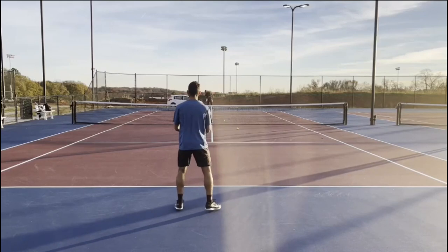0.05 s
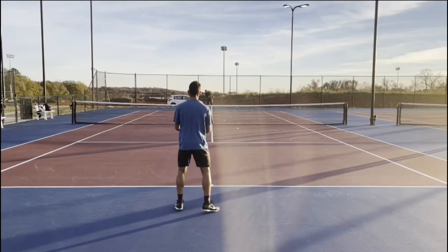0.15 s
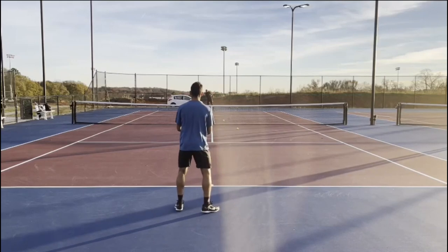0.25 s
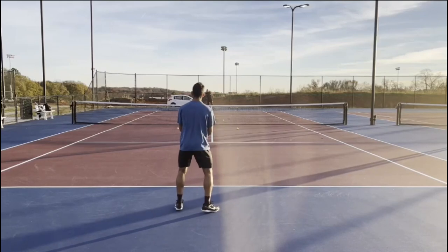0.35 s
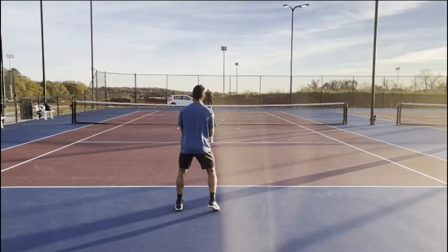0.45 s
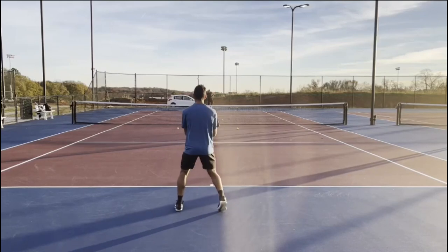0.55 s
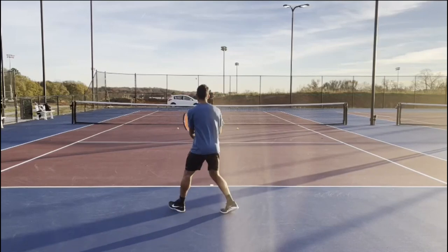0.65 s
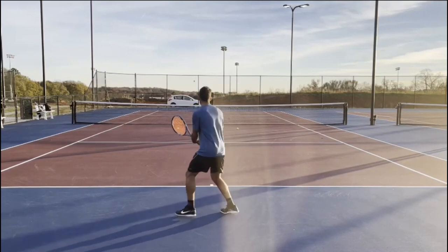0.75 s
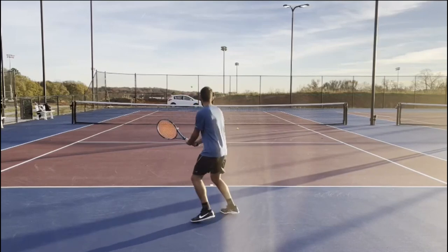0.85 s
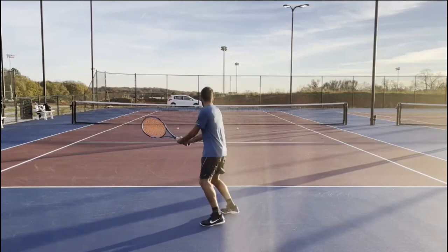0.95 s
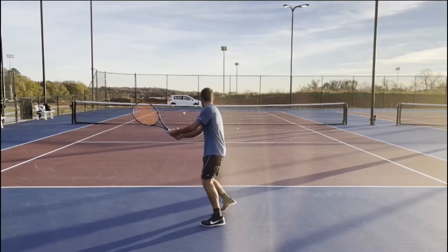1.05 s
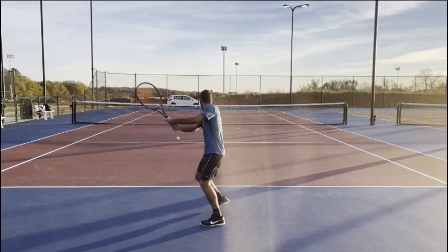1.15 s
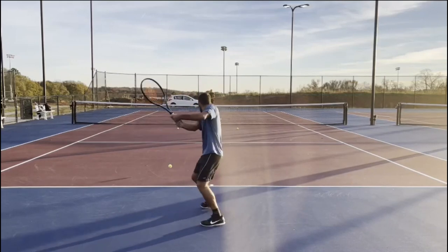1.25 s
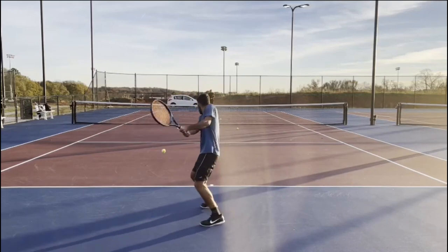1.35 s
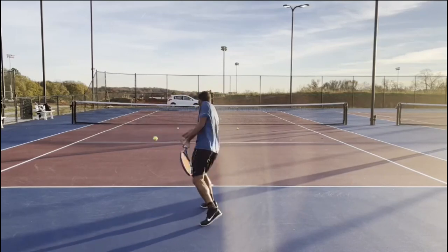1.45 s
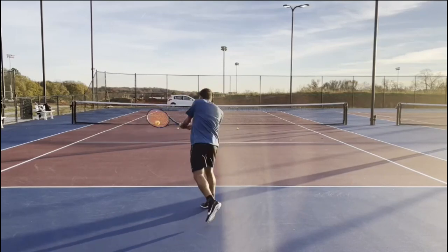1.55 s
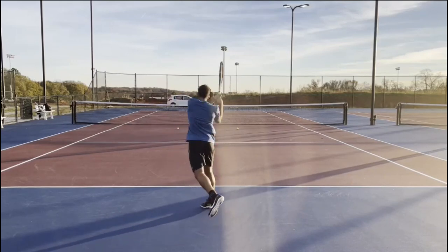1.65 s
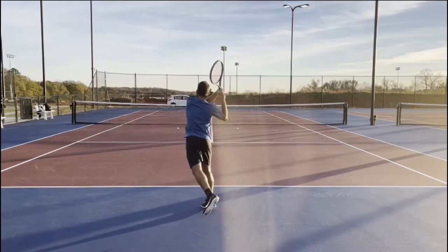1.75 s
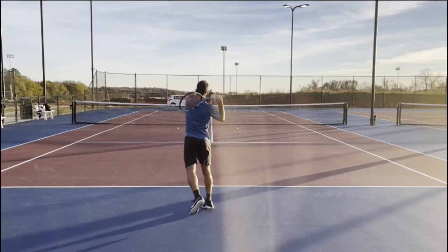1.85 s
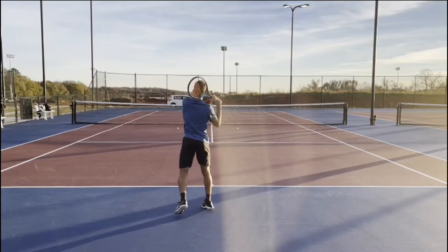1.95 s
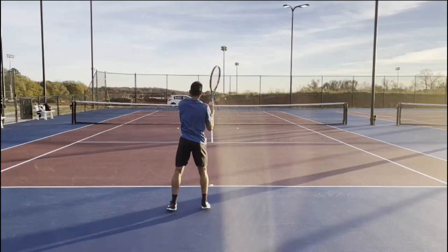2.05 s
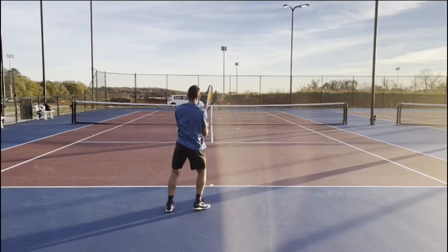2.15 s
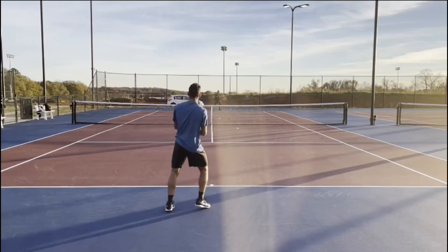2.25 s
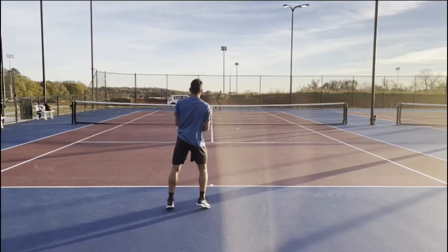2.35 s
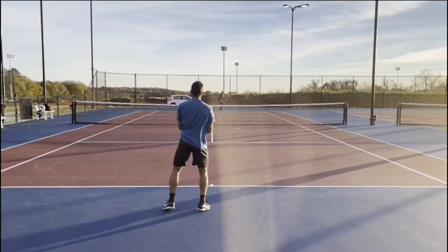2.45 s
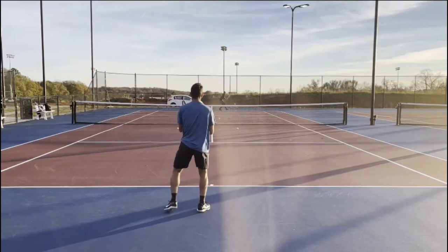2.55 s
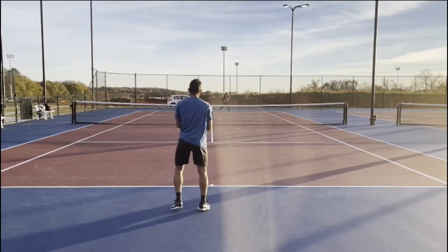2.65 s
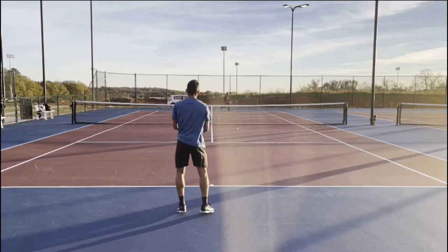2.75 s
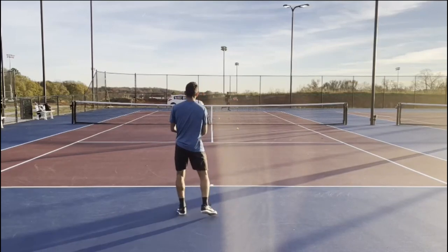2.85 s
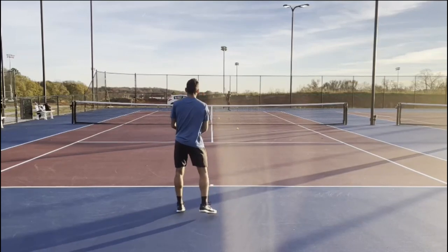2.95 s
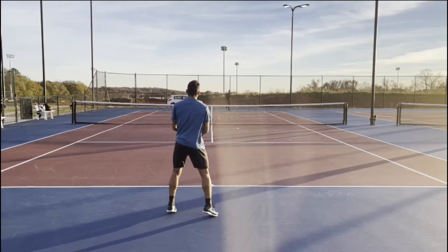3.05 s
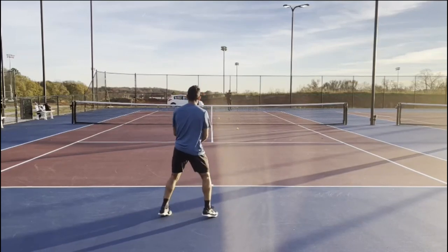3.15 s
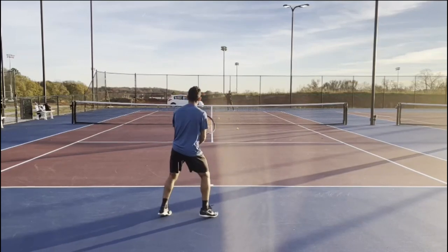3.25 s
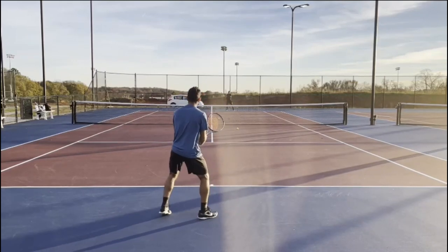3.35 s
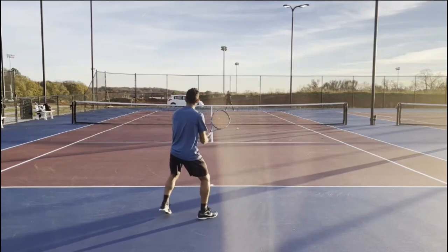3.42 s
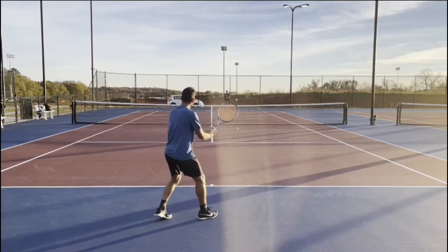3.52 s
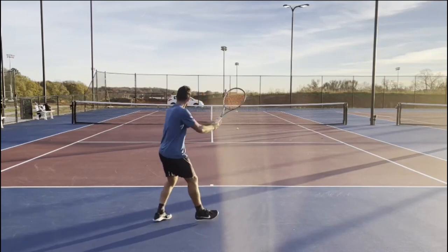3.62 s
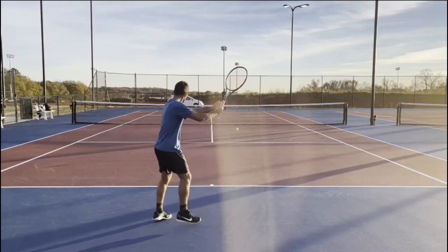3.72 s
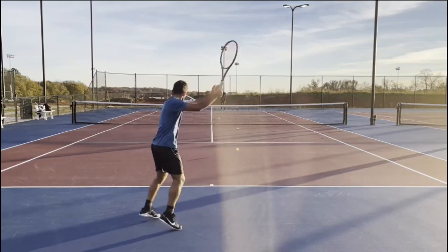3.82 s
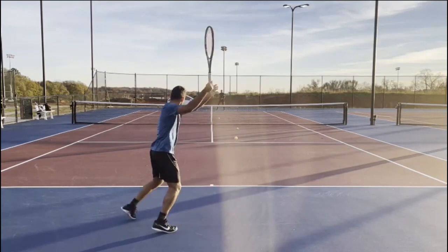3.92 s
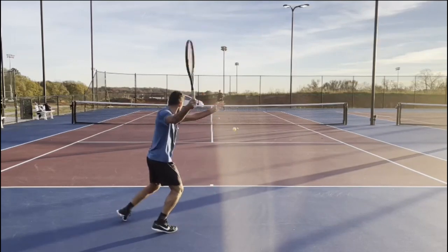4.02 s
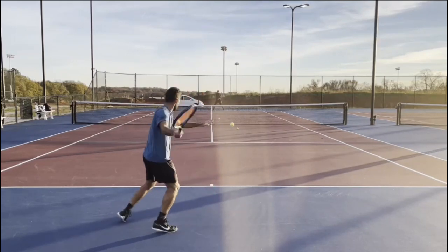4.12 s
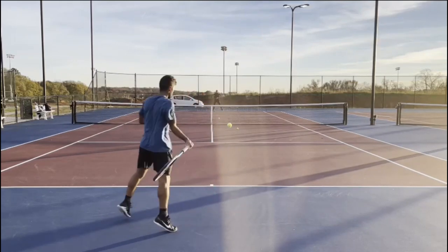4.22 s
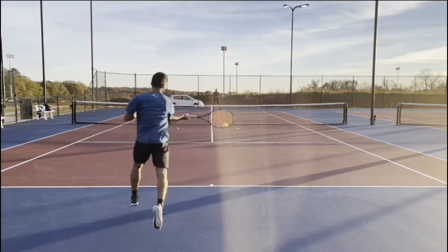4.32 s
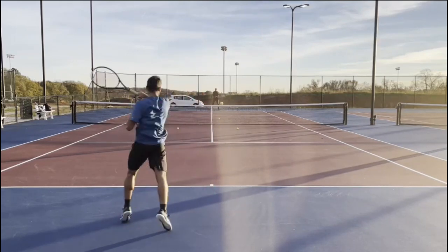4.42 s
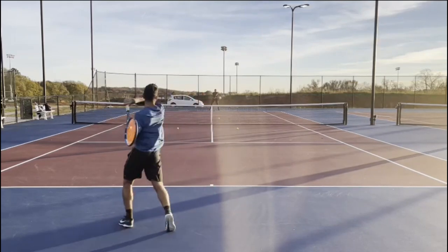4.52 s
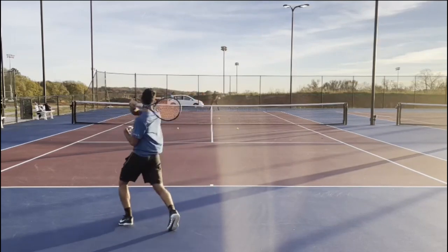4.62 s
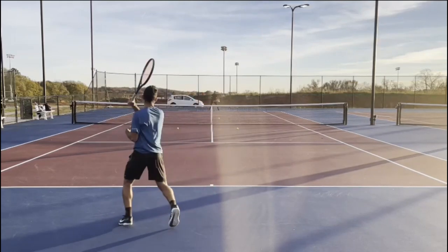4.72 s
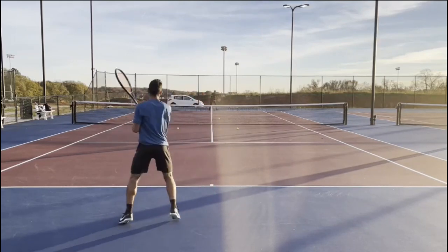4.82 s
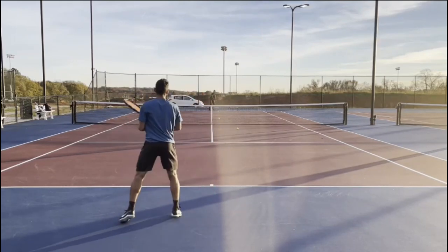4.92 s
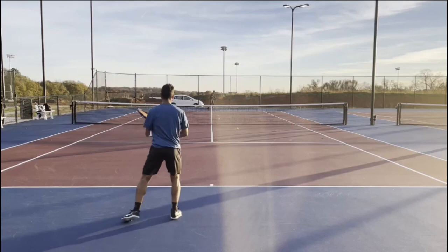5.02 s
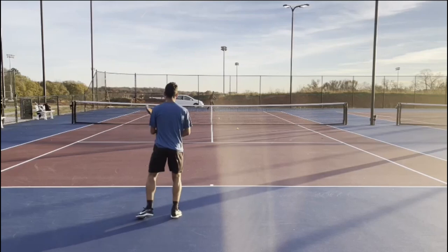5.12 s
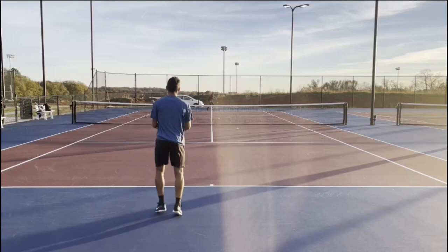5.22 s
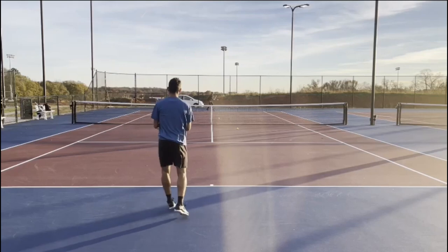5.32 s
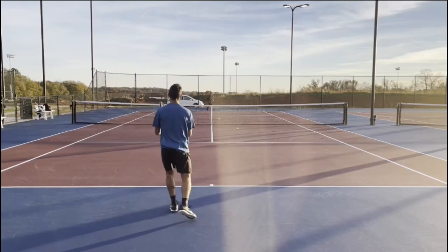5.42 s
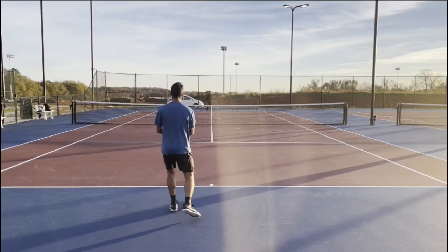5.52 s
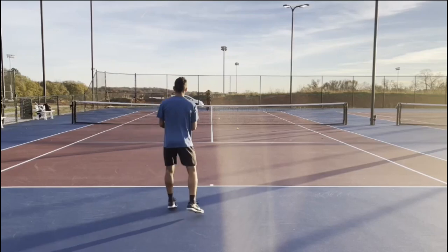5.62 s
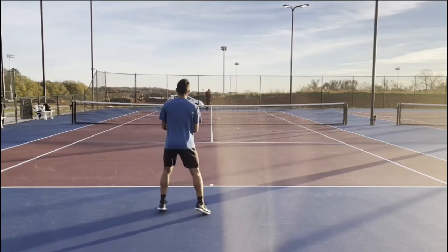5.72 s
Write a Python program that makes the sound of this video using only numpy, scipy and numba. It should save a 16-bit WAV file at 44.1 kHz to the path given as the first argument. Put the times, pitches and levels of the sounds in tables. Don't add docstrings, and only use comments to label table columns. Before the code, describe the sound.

Two players exchange tennis shots in open air. The nearer racket gives two hard, stringy pops, at about 1.6 and 4.4 seconds, each just after a hollow bounce; distant strokes sound duller and wetter. Between them, soles scrape, skid and squeal on gritty paint and heels tap. Far traffic rumbles and rises, with a faint motor hum and barely audible insect. Small stereo microphone behind the near player, dulled top treble.

```python
import sys
import numpy as np
from scipy import signal
from scipy.fft import rfft, irfft, next_fast_len
from scipy.io import wavfile
from scipy.ndimage import uniform_filter1d
from numba import njit

SR = 44100
rng = np.random.default_rng(int(sys.argv[2]) if len(sys.argv) > 2 else 0)


def to_wav(sig):
    pcm = np.clip(np.atleast_2d(sig), -1, 1) * 32767
    pcm = np.round(pcm).astype(np.int16)
    wavfile.write(sys.argv[1], SR, pcm.T)


def voltage_ratio(level):
    return 10 ** (np.asarray(level, float) / 20)


N = 254898

# (t/s, level/dB)
ROAD_SWELL = [(0.0, -47.5), (1.3, -46), (1.53, -44.5), (2.37, -41.5), (2.69, -37), (3.01, -34.5),
              (3.53, -35.5), (3.99, -35.5), (4.33, -36.5), (4.64, -35), (5.34, -40.5), (5.78, -40.5)]
# (f/Hz, level per Hz/dB)
ROAD_SPECTRUM = [(12, -40), (20, -24.5), (54, 10), (87, 13), (276, -30), (351, -28), (446, -31), (742, -28),
                 (1570, -36.5), (2680, -68.5), (6660, -74.5), (7820, -77.5), (9950, -78.5), (11100, -57.5),
                 (12000, -73), (15600, -103), (22000, -120)]
# (f/Hz, likeness from -1 to 1)
ROAD_LIKENESS = [(60, .96), (130, .92), (300, .75), (520, 0), (900, -.4), (1400, 0), (2000, .85),
                 (4500, .6), (6500, 1)]
# (t/s, f/Hz, level/dB)
MOTOR_TONE = [(0, 341.4, -60.5), (.6, 346.3, -69.5), (1.6, 341.8, -63), (2.7, 350, -65), (3.1, 352, -65.5),
              (3.8, 344.3, -69.5), (5.0, 364.3, -73), (5.3, 355, -86)]

# (f/Hz, level per Hz/dB)
GRIT_SPECTRUM = [(400, -24.5), (900, -4), (2000, 0.5), (3500, -1), (6000, -9), (9000, -7.5), (11500, -10.5),
                 (13000, -45)]
# (t/s, time to full weight/s, level/dB, time to fade 20 dB/s)
SHUFFLES = [(.24, 0.0074, -71, -0.03), (0.437, 0.02, -67.5, 0.1), (.48, .05, -69, -0.5),
            (0.619, 0.078, -65.5, .04), (0.742, 0.01, -67, .053), (.846, .002, -78.5, .04),
            (1.0, 0.055, -67.5, 0.1), (1.081, 0.029, -66, 0.04), (1.326, 0.0023, -66, 0.06),
            (1.43, .05, -71, 0.1), (2.87, 0.0022, -72, -1.2), (5.2, .002, -76, 0.54),
            (1.488, 0.092, -57, 0.14), (1.761, .03, -66.5, .3), (2.061, 0.068, -56.5, 0.07),
            (2.2, 0.0018, -72.5, .09), (2.415, 0.0032, -63.5, 0.1), (2.704, 0.046, -68, 0.2),
            (3.19, 0.0018, -68.5, 0.7), (3.395, 0.013, -71.5, -0.05), (3.541, .036, -63, 0.14),
            (3.63, .002, -82, 1.5), (3.784, 0.0059, -55.5, 0.12), (3.95, .002, -73.5, 0.3),
            (4.275, 0.012, -55, .065), (4.83, 0.041, -76.5, 1), (5.26, 0.022, -68.5, 0.14),
            (4.6, .002, -71, -0.44), (4.31, 0.038, -65, -0.57), (5.57, .115, -66, .03)]
# (t/s,
# load/s, level/dB, fade/s, f/Hz)
SCUFFS = [(.153, 0.015, -56, 0.05, 2400), (.122, .002, -69, 0.21, 2650), (1.615, .002, -47.5, .08, 2140),
          (2.125, 0.012, -42.5, 0.0554, 3100), (2.48, .002, -71.5, .08, 2240),
          (2.97, 0.0025, -54.5, 0.24, 2220), (3.81, 0.014, -53.5, 0.02, 3020),
          (3.89, 0.021, -48.5, 0.0263, 2650), (4.335, 0.059, -48, 0.1341, 3030),
          (4.385, 0.0025, -47.5, 0.2028, 2595), (4.49, 0.0034, -47, 0.04, 3940),
          (5.375, .002, -66, 0.12, 2200), (5.705, 0.0028, -52, 0.1, 2500)]
# (t/s, load/s, level/dB, fade/s, f/Hz)
DRAGS = [
    (2.835, .002, -52.5, .046, 3740),
    (3.065, .012, -56.5, .036, 2400),
    (4.53, .03, -56.5, .045, 2800),
    (4.974, .015, -55, .115, 2340),
    (5.135, .02, -61.5, .055, 5000),
    (5.288, .022, -57, .022, 2650),
]
# (t/s, load/s, level/dB, fade/s, f/Hz)
SLIDES = [
    (.899, .068, -41.5, .024, 4700),
    (1.266, .036, -56, .02, 5200),
]
# (t/s, load/s, level/dB, fade/s, f/Hz)
SQUEAKS = [
    (3.214, .016, -62, .045, 4300),
    (3.3, .032, -57, .025, 2300),
]
# (t/s, load/s, level/dB, fade/s, first f/Hz)
SKIDS = [
    (3.13, .035, -45.5, .024, 5600),
    (5.745, .022, -43.5, .025, 4100),
]
# (t/s, click level/dB, thump level/dB)
HEEL_TAPS = [(0.183, -50, -42), (.477, -56.5, -65), (.686, -57, -65.5), (0.759, -62, -57.5),
             (2.079, -51, -52), (2.472, -46, -40), (4.221, -66, -56), (1.492, -58, -54),
             (1.905, -65, -65.5), (2.79, -61, -59), (2.818, -61.5, -62), (3.683, -70.5, -61.5),
             (4.915, -67, -61), (5.381, -61.5, -62), (4.972, -50.5, -58.5), (5.263, -55.5, -60)]

# (f/Hz, level/dB, time to fade 60 dB/s)
BALL_PING = [(754, -14, 0.036), (1506, 11.5, 0.01), (2500, -5.5, 0.003)]
# (f/Hz, level/dB, time to fade 60 dB/s)
BALL_THUMP = [(230, 0, .027), (400, -8, .016)]
# (t/s, ping level/dB, thump level/dB, ping pitch factor, thump pitch factor)
NEAR_BOUNCES = [
    (1.3056, -32, -21.5, 0.85, 0.97),
    (2.772, -47, -32.5, 0.44, 1.58),
    (3.8799, -31, -20.5, 0.88, 1.39),
    (4.481, -31.5, -16.5, 0.67, 1.52),
    (5.124, -50.5, -41.5, 0.8, 1.28),
]
# (t/s, ping level/dB, thump level/dB, ping pitch factor, thump pitch factor)
FAR_BOUNCES = [
    (0.116, -37, -61, 0.87, 1.8),
    (.617, -66.5, -39.5, 0.71, 1.4),
    (3.532, -43.5, -32.5, 0.52, 1.36),
]

# (f/Hz, level/dB, time to fade 60 dB/s)
BACKHAND = [(150.6, -5.5, 0.014), (436, -20.5, 0.19), (519, 6.5, 0.014), (806, -2.5, 0.031),
            (1100, 4.5, 0.011), (1202, -14, 0.068), (1380, -18, .022), (1815, -7.5, 0.028),
            (1963, -8, 0.029), (2430, -17, 0.03), (3150, -17, 0.051)]
# (f/Hz, level/dB, time to fade 60 dB/s)
FOREHAND = [(149.8, -12, 0.0079), (460, -18, 0.2), (478, 4, 0.016), (747, -9, 0.035), (876, -6, 0.053),
            (1285, -6.5, 0.014), (1256, -38.5, 0.24), (1700, -12.5, 0.024), (2400, -10, 0.021),
            (3100, -7.5, 0.0064), (6020, -22.5, .022)]
# (f/Hz, level/dB, time to fade 60 dB/s)
FAR_STROKE = [(350, 2, 0.021), (506, 2, 0.017), (993, 2.5, 0.021), (890, -39, 0.27), (1060, -36, 0.25),
              (1325, -4, 0.012), (1780, -20, 0.029)]
# (t/s, pop level/dB, felt crackle level/dB, pitch factor, lean to the left/dB)
NEAR_HITS = [
    (1.5994, -10, -23.5, 0.94, -8.5),
    (4.3710, -6, -23, 1.0, -37.5),
]
# (t/s, pop level/dB, felt crackle level/dB, pitch factor, lean to the left/dB)
FAR_HITS = [
    (0.1196, -29.5, -63, 0.85, -59.5),
    (2.9585, -13, -42, 0.99, -53),
    (5.6945, -16.5, -42, 0.92, -38.5),
]
# (delay t/s, level/dB)
ECHO_FADE = [(.004, -1.5), (.02, 3.5), (.05, -6), (.09, -9), (.12, -14), (.2, -16), (.3, -28.5), (.45, -32)]
# (f/Hz, level/dB)
ECHO_COLOUR = [(150, -6), (450, -5), (1000, -4.5), (1600, -6), (3500, -14.5), (8000, -8.5)]

# (f/Hz, left ahead/rad)
PORT_PHASE = [(0, 0), (1500, 0), (4800, 1.1), (5600, 0), (6800, -1), (7600, -np.pi), (10000, -np.pi),
              (12500, -2 * np.pi)]
# (f/Hz, left minus right level/dB)
PORT_TILT = [(100, 1.13), (1000, 1), (5000, 1.5), (10000, 7)]

SAME_ABOVE_HZ = 7000
SHUFFLE_HZ = 2180


def rms_one(x):
    return x / np.sqrt(np.mean(x ** 2) + 1e-20)


def in_time(rows):
    s, *columns = np.transpose(rows)
    return [np.interp(np.arange(N) / SR, s, column) for column in columns]


def at_hz(points, hz):
    point_hz, value = np.transpose(points)
    return np.interp(np.log(hz + 1), np.log(point_hz + 1), value)


def colour(x, points):
    gain = voltage_ratio(at_hz(points, np.fft.rfftfreq(len(x), 1 / SR)))
    return irfft(rfft(x) * gain, len(x))


def drift(rate_hz):
    r = np.exp(-80 * np.pi * rate_hz / SR)
    slow = signal.lfilter([1], [1, -2 * r, r * r], rng.standard_normal(N // 40 + 2002))
    slow = rms_one(slow[2000:])
    return np.interp(np.arange(N) / 40, np.arange(len(slow)), slow)


def add(out, s, sound):
    i = round(s * SR)
    out[..., i:i + sound.shape[-1]] += sound[..., :N - i]


def apart(x):
    low = signal.butter(6, SAME_ABOVE_HZ, fs=SR, output="sos")
    return signal.sosfilt(low, x) * [[1], [-1]]


@njit
def moving_resonance(x, hz, width):
    y = np.zeros(len(x))
    for i in range(2, len(x)):
        r = np.exp(-np.pi * width[i] / SR)
        push = (1 - r * r) / 2 * (x[i] - x[i - 2])
        y[i] = push + 2 * r * np.cos(2 * np.pi * hz[i] / SR) * y[i - 1] - r * r * y[i - 2]
    return y


def struck(modes, pitch, push_s):
    t = np.arange(SR // 2) / SR
    rings = np.zeros(len(t))
    for k, (hz, db, t60) in enumerate(modes):
        rings += (-1) ** k * voltage_ratio(db - 60 * t / t60) * np.sin(2 * np.pi * hz * pitch * t)
    push = np.hanning(max(round(push_s * SR), 1) + 2)
    return np.convolve(rings, push / push.sum())


def crackle(rise_s, t60, cut_hz):
    t = np.arange(SR // 10) / SR
    rise = np.minimum(t / rise_s + 0.13, 1)
    fade = voltage_ratio(-60 * np.maximum(t - rise_s, 0) / t60)
    band = signal.butter(1, [900, cut_hz], "band", fs=SR, output="sos")
    return rise * fade * rms_one(signal.sosfilt(band, rng.standard_normal(len(t))))


def echo(sound):
    delay, db = np.transpose(ECHO_FADE)
    t = np.arange(SR // 2) / SR
    fade_db = np.interp(t, delay, db, left=-90) + 1.4 * drift(30)[:len(t)]
    returns = rms_one(colour(rng.standard_normal(len(t)), ECHO_COLOUR)) * voltage_ratio(fade_db) / 10
    first = sound[:SR // 150]
    return signal.fftconvolve(first * np.linspace(1, 0, len(first)), returns)


def road(patchy_db):
    lag_s, upper_rumble_db, upper_follows, tyre_wash_db = 0.068, -7, 1.01, -58
    deep_db, = in_time(ROAD_SWELL)
    later_db, = in_time([(s + lag_s, db) for s, db in ROAD_SWELL])
    usual_db = deep_db.mean()
    upper_db = usual_db + upper_rumble_db + upper_follows * (later_db - usual_db)

    edges = 18 * 2 ** np.arange(0, 9.1, .5)
    white = rng.standard_normal((2, 2, N + SR // 2))
    ranges = np.zeros((3, 2, N))
    for k, (low, high) in enumerate(zip(edges, edges[1:])):
        band_pass = signal.butter(3, [low, high], "band", fs=SR, output="sos")
        mid, side = signal.sosfilt(band_pass, white[k % 2])[:, -N:]
        hz = np.sqrt(low * high)
        alike = np.clip(at_hz(ROAD_LIKENESS, hz), -1, 1)
        band = np.sqrt(1 + alike) * mid + np.sqrt(1 - alike) * side * [[1], [-1]]
        which = int(hz > 100) + int(hz > 210)
        ranges[which] += band * voltage_ratio(at_hz(ROAD_SPECTRUM, hz) + patchy_db * drift(3.3))
    levels = (deep_db, upper_db, tyre_wash_db)
    return sum(voltage_ratio(db) * rms_one(part) for db, part in zip(levels, ranges))


def motor():
    hz, db = in_time(MOTOR_TONE)
    return np.sqrt(2) * voltage_ratio(db + 2.7 * drift(6.5)) * np.sin(2 * np.pi * np.cumsum(hz) / SR)


def insect():
    hiss_hz, width_hz, throbs_per_s, level_db = 4730., 350., 8.3, -94
    hiss = moving_resonance(rng.standard_normal(N), np.full(N, hiss_hz), np.full(N, width_hz))
    phase = 2 * np.pi * throbs_per_s * np.arange(N) / SR + 2 * drift(4.9)
    throb = np.maximum(np.sin(phase) + .3, 0)
    return voltage_ratio(level_db + drift(0.42)) * rms_one(hiss * throb)


def tread(curves, steps, bite, swell, squeal, sag, stop):
    level_db, hz, share = curves
    for s, load_s, db, fade_s, centre_hz in steps:
        since = np.arange(N) / SR - s
        attack_db = bite * np.minimum(since, 0) + swell * np.clip(since - load_s, -load_s, 0)
        fade_db = 20 * (np.maximum(since - load_s, 0) / max(fade_s, .003)) ** stop
        step_db = db + attack_db - fade_db
        on = step_db > level_db
        level_db[on] = step_db[on]
        share[on] = squeal * np.clip(.3 + .7 * since[on] / max(load_s, .001), 0, 1)
        hz[on] = centre_hz * 2 ** -np.clip(sag * since[on], 0, 1.3)


def footwork():
    level_db, hz, share = np.full(N, -130.), np.full(N, float(SHUFFLE_HZ)), np.zeros(N)
    curves = level_db, hz, share
    shuffles = [(*row, SHUFFLE_HZ) for row in SHUFFLES]
    tread(curves, SCUFFS, bite=1700, swell=150, squeal=.12, sag=.3, stop=.87)
    tread(curves, shuffles, bite=1100, swell=160, squeal=.04, sag=.3, stop=.77)
    tread(curves, DRAGS, bite=5000, swell=200, squeal=.2, sag=.3, stop=2.2)
    tread(curves, SLIDES, bite=5000, swell=150, squeal=.55, sag=.3, stop=2.1)
    tread(curves, SQUEAKS, bite=1500, swell=200, squeal=.85, sag=1.5, stop=1.6)
    tread(curves, SKIDS, bite=8000, swell=200, squeal=.55, sag=25, stop=1.8)
    return level_db, uniform_filter1d(hz, size=200), uniform_filter1d(share, size=200)


def shoes(grains_per_s, spread_db, flutter_db, scatter_db):
    level_db, hz, share = footwork()
    share = np.clip(share, 0, .98)
    sizes = voltage_ratio(spread_db * np.minimum(rng.exponential(1, N), 5)) * rng.choice([-1, 1], N)
    grains = sizes * (rng.random(N) < grains_per_s / SR)
    grit = rms_one(colour(grains, GRIT_SPECTRUM))
    bright_db = 0.2 + 7.5 * np.log2(hz / SHUFFLE_HZ)
    treble = signal.sosfilt(signal.butter(2, 5000, "high", fs=SR, output="sos"), grit)
    grit += (voltage_ratio(bright_db) - 1) * treble

    width = hz / 3
    once = moving_resonance(rng.standard_normal(N), hz, width)
    squeal = moving_resonance(once, hz, width) * np.sqrt(4 * SR / np.pi / width)
    direct = np.sqrt(1 - share) * grit + np.sqrt(share) * squeal
    scattered = voltage_ratio(scatter_db) * apart(np.roll(direct, SR // 9))
    return voltage_ratio(level_db + flutter_db * drift(34)) * (direct + scattered)


def bounces():
    near_click_db, far_click_db = -5.5, -26
    tap_ping_db, tap_pitch = -7.5, 1.05
    contacts = [(row, row[1] + near_click_db) for row in NEAR_BOUNCES]
    contacts += [(row, row[1] + far_click_db) for row in FAR_BOUNCES]
    for s, click_db, thump_db in HEEL_TAPS:
        contacts.append(((s, click_db + tap_ping_db, thump_db, tap_pitch, tap_pitch), click_db))

    out = np.zeros(N)
    for (s, ping_db, thump_db, ping_pitch, thump_pitch), click_db in contacts:
        hit = np.zeros(SR)
        add(hit, 0, voltage_ratio(ping_db) * struck(BALL_PING, ping_pitch, push_s=0.00044))
        add(hit, .0032, -voltage_ratio(thump_db) * struck(BALL_THUMP, thump_pitch, push_s=0.0013))
        add(out, s, hit)
        add(out, s, voltage_ratio(-32.5) * echo(hit))
        add(out, s - .0007, voltage_ratio(click_db) * crackle(0.00058, t60=0.014, cut_hz=3300))
    return out


def rackets():
    contact_s, lean_s = 0.0041, .0003
    near_echo_db, far_echo_db = -34, -31
    ground_s, ground_db = .0042, -13
    fence_s, fence_db = .09, -42
    bodies = [(BACKHAND, near_echo_db), (FOREHAND, near_echo_db)]
    bodies += [(FAR_STROKE, far_echo_db)] * len(FAR_HITS)

    out, lean = np.zeros((2, N))
    for (modes, echo_db), hit in zip(bodies, NEAR_HITS + FAR_HITS):
        s, pop_db, crackle_db, pitch, lean_db = hit
        stroke = np.zeros(N)
        pop = voltage_ratio(pop_db) * struck(modes, pitch, push_s=.0003)
        add(stroke, s, pop)
        add(stroke, s - .0022, -voltage_ratio(-22.5) * pop)
        felt = crackle(contact_s, t60=.026, cut_hz=7000)
        add(stroke, s - contact_s, voltage_ratio(crackle_db) * felt)
        lean += voltage_ratio(lean_db) * np.roll(stroke, -round(lean_s * SR))
        out += stroke
        add(out, s, voltage_ratio(echo_db) * echo(pop))
        if modes is not FAR_STROKE:
            add(out, s + ground_s, voltage_ratio(ground_db) * pop)
            add(out, s + fence_s, voltage_ratio(fence_db) * echo(pop))
    return out + apart(lean)


def scene():
    background = road(patchy_db=1.63) + motor() + insect()
    soles = shoes(grains_per_s=11000, spread_db=3.0, flutter_db=2.5, scatter_db=-4.5)
    return background + soles + bounces() + rackets()


def roll_off(x):
    return signal.sosfilt(signal.butter(12, 13180, fs=SR, output="sos"), x)


def record(dry):
    size = next_fast_len(N + SR)
    hz = np.fft.rfftfreq(size, 1 / SR)
    tilt_db = at_hz(PORT_TILT, hz) * (hz < SAME_ABOVE_HZ)
    phase = np.interp(hz, *np.transpose(PORT_PHASE))
    half = voltage_ratio(tilt_db / 2) * np.exp(.5j * phase)
    ports = irfft(rfft(dry, size) * np.stack([half, np.exp(-np.log(half))]), size)[:, :N]
    ports = signal.sosfilt(signal.butter(2, 34, "high", fs=SR, output="sos"), ports)
    ports = signal.sosfilt(signal.cheby2(12, 50, 12590, fs=SR, output="sos"), ports)
    return roll_off(ports)


dry = scene()
out = record(dry)
to_wav(out)
```